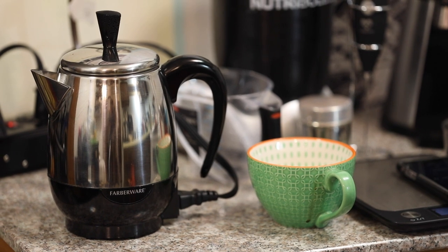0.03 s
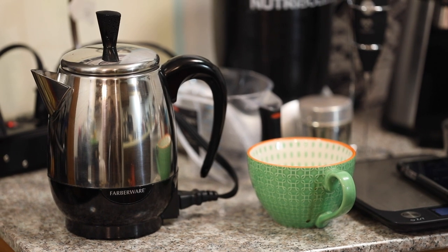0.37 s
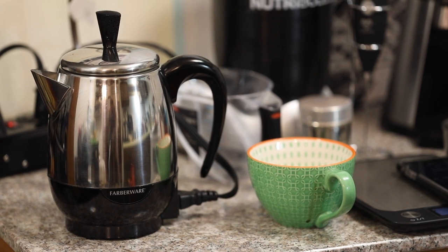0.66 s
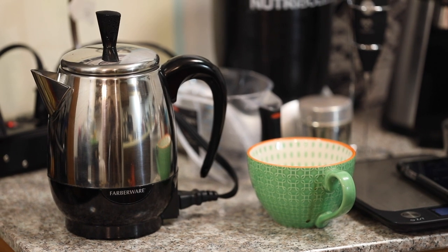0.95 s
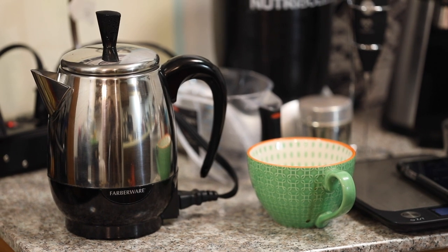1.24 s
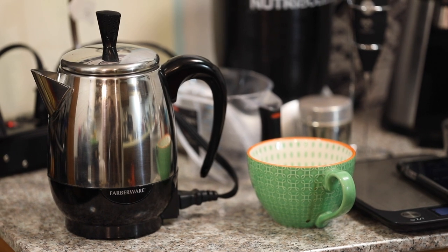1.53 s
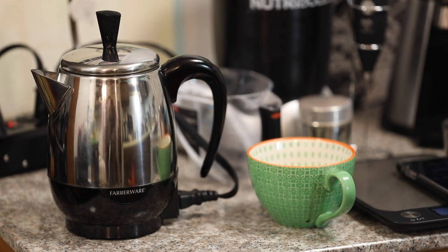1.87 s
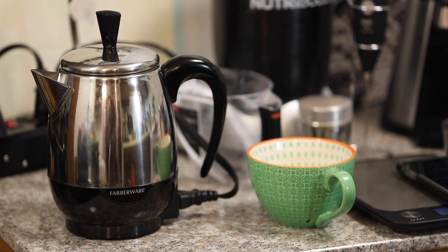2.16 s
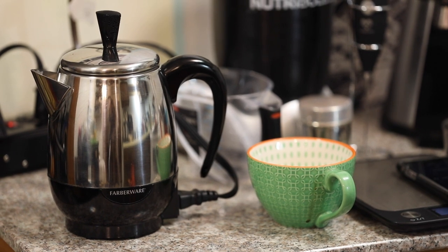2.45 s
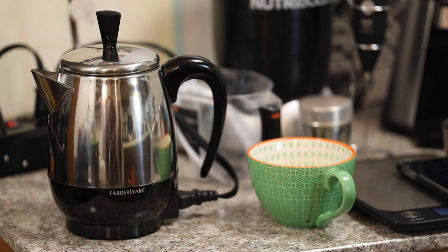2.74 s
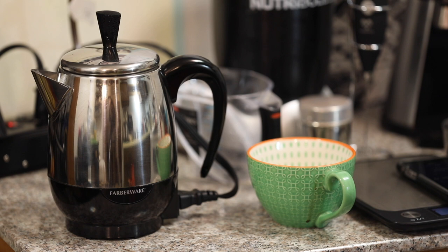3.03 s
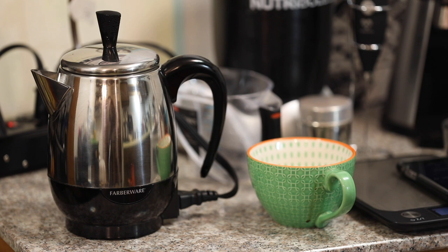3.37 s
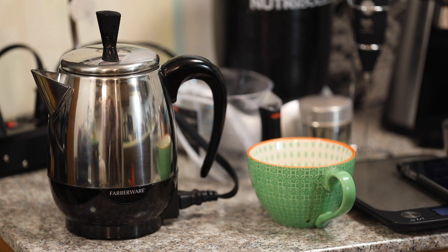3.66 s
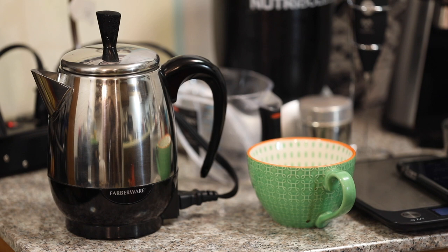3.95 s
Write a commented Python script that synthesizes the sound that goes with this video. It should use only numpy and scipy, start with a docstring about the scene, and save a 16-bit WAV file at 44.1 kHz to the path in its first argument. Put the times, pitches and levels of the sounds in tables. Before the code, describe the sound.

A steel percolator heating water rumbles and patters with soft knocks in a small kitchen. Bubbles blip and fizz faintly while the metal ticks, clicking sharply once early on and clinking lightly now and then.

```python
"""A low rumble with irregular thumps: water heats in a steel percolator on a kitchen counter.
Steam bubbles collapse on the hot base and excite the modes of the pot; a few stand out, many small ones
merge into the rumble. Tiny bubbles ping the steel wall and fizz, freed bubbles ring as blips, the water
pops, loose parts clink and the warming metal ticks, once sharply. A small room reverberates the blips,
pops, clinks and ticks, over a faint mains hum."""
import sys
import numpy as np
from scipy import signal
from scipy.fft import rfft, irfft
from scipy.io import wavfile
from scipy.ndimage import map_coordinates

SR = 44100
rng = np.random.default_rng(int(sys.argv[2]) if len(sys.argv) > 2 else 0)


def dump(signal):
    """Clip the signal to [-1, 1] and save it as 16-bit WAV at the path in sys.argv[1]."""
    limited = np.clip(np.atleast_2d(signal).T, -1, 1)
    pcm = np.round(limited * 32767).astype(np.int16)
    wavfile.write(sys.argv[1], SR, pcm)


N = 176400
T = np.arange(SR // 3) / SR  # time axis of one event, t/s


def amp(db):
    """Amplitude ratio of a level in decibels."""
    return 10 ** (np.asarray(db) / 20)


def unit(x):
    """Normalisation to rms 1."""
    return x / np.sqrt(np.mean(x ** 2) + 1e-20)


def along(points, hz):
    """Interpolation of (f/Hz, value) points on a logarithmic frequency axis."""
    f, values = np.transpose(points)
    return np.interp(np.log(hz + 1), np.log(f + 1), values)


def curve(rows):
    """Linear interpolation of (t/s, value) rows at every sample."""
    return np.interp(np.arange(N) / SR, *np.transpose(rows))


def wobble(knots_per_s):
    """Random modulation: a spline through Gaussian knots."""
    return map_coordinates(rng.standard_normal(4096), [np.arange(N) * knots_per_s / SR], mode="wrap")


def noise(colour, size):
    """Spectral shaping of white noise by (f/Hz, level/dB) points; rms 1."""
    gain = amp(along(colour, np.fft.rfftfreq(size, 1 / SR)))
    return unit(irfft(rfft(rng.standard_normal(size)) * gain, size))


def fade(attack_s, t60):
    """Envelope of a damped vibration: a quick rise and a decay of 60 dB in t60 seconds."""
    return (1 - np.exp(-T / attack_s)) * np.exp(-np.log(1000) * T / t60)


def burst(colour, attack_s, t60):
    """Modal overlap: dense modes decay like a band of noise, with the energy of the envelope."""
    envelope = fade(attack_s, t60)
    return unit(noise(colour, len(T)) * envelope) * np.sqrt(np.mean(envelope ** 2))


def ring(modes, attack_s):
    """Modal synthesis: a sum of damped sinusoids with scattered levels and random phases."""
    chance = rng.standard_normal((len(modes), 2))
    return sum(amp(db + 3.53 * scatter) * np.sin(2 * np.pi * (hz * T + phase)) * fade(attack_s, t60)
               for (hz, db, t60), (scatter, phase) in zip(modes, chance))


def add(track, s, sound):
    """Superposition of a sound on the track, s seconds in."""
    part = track[max(0, round(s * SR)):][:len(sound)]
    part += sound[:len(part)]


def in_room(sound, wet_db):
    """Reverberation: direct sound plus a diffuse field, by convolution with decaying noise."""
    # reverberation time of the small room: f/Hz, t60/s
    room = [(200, 0.28), (2000, 0.42), (12000, .22)]
    hz, t, spectra = signal.stft(rng.standard_normal(len(T)), SR, nperseg=256)
    decay = np.exp(-np.log(1000) * t / along(room, hz)[:, None])
    tail = signal.istft(spectra * decay, SR, nperseg=256)[1]
    return sound + amp(wet_db) * signal.fftconvolve(sound, tail / np.linalg.norm(tail))[:len(sound)]


def hum():
    """Forced vibration: faint steady tones near the mains frequency and its double."""
    # mains tones: f/Hz, level/dB
    tones = [(59, -82), (119.5, -70)]
    return sum(amp(db) * unit(np.sin(2 * np.pi * hz * np.arange(N) / SR)) for hz, db in tones)


def simmer():
    """Incoherent summation: countless tiny bubbles merge into noise and keep a wall mode ringing."""
    # spectra of the low, middle and high bubble noise and of the wall mode: f/Hz, relative level/dB
    rumble_colour = [(25, -35), (72, -34), (92, -17.5), (110, -26.5), (135, -23), (153, -7), (178, -9),
                     (195, -6.5), (215, -5), (262, -2.5), (292, 4.5), (328, -12.5), (365, 6), (398, -5.5),
                     (422, -22), (445, 4), (480, 0.5), (505, -2), (570, -7), (690, -17.5), (850, -14.5),
                     (980, -27.5), (1500, -38), (3000, -96)]
    seethe_colour = [(100, -15), (600, 4.5), (1250, 3), (1800, 0), (2600, -8), (3000, -10), (4000, -16.5),
                     (5200, -27), (8000, -32)]
    fizz_colour = [(2000, -43), (4500, -4.5), (5900, -10), (6220, 3.5), (6420, -12.5), (6780, 11),
                   (7100, -5), (7260, 4.5), (7450, -4), (8000, -1), (8600, -8), (9400, -1), (10200, -5),
                   (10700, 2), (11200, -4), (12500, -5.5), (15700, -9.5)]
    wall_colour = [(2000, -48), (2680, -15), (2790, 1.5), (2900, -17.5), (3600, -31)]
    # slow drift of the rumble and the seethe: t/s, relative level/dB
    rumble_drift = [(0.0, -39.5), (1.78, -40), (1.89, -39), (2.15, -40.5), (2.48, -38), (2.74, -41.5),
                    (3.81, -39), (3.89, -40), (4.0, -38)]
    seethe_drift = [(0.0, -53), (0.43, -57), (0.76, -54.5), (1.73, -56.5), (1.95, -55.5), (2.33, -57.5),
                    (2.96, -54), (3.43, -56), (4.0, -54.5)]
    rumble = amp(curve(rumble_drift) - 2 + wobble(29.9)) * noise(rumble_colour, N)
    seethe = amp(curve(seethe_drift) + 0.5 + 1.2 * wobble(45)) * noise(seethe_colour, N)
    wall = amp(-70 + 3.6 * wobble(14)) * noise(wall_colour, N)
    fizz = amp(-66.5 + 0.6 * wobble(25.6)) * noise(fizz_colour, N)
    return rumble + seethe + wall + fizz


def pings():
    """Impulse excitation: tiny bubbles set high, lightly damped modes of the steel wall ringing."""
    # bubbles at the wall: t/s, relative level/dB
    events = [(0.1002, -50), (0.1401, -68), (0.5173, -57), (0.614, -58), (0.7784, -58), (1.019, -56.5),
              (1.182, -53.5), (1.2411, -55), (1.5207, -58), (1.5868, -59), (1.7752, -61), (1.8925, -63),
              (2.095, -53), (2.367, -52.5), (2.7126, -56), (2.8394, -49.5), (3.0203, -58), (3.0966, -59.5),
              (3.1583, -61), (3.186, -54.5), (3.2688, -56), (3.3676, -58), (3.5094, -57), (3.71, -60),
              (3.9394, -55.5)]
    # response of the wall: f/Hz, relative level/dB
    colour = [(3000, -54), (5900, -24), (6220, -30), (6420, -13), (6620, -4.5), (6780, 0), (6880, -11),
              (6980, -1.5), (7120, -9), (7500, -26), (9000, -37), (10700, -30), (13000, -45)]
    out = np.zeros(N)
    for s, db in events:
        add(out, s, amp(db - 6) * burst(colour, attack_s=0.0014, t60=0.33))
    return out


def ticks():
    """Thermal expansion: the warming steel ticks, each time favouring one band of its modes."""
    # ticks: t/s, relative level/dB, favoured f/Hz
    events = [(0.002, -54, 8500), (0.271, -60, 10800), (0.344, -59, 10800), (0.938, -53.5, 9000),
              (0.975, -55, 7300), (1.246, -53, 10000), (1.28, -55, 9800), (1.324, -55, 11000),
              (1.401, -51, 9300), (1.608, -60, 10500), (2.175, -57.5, 7500), (2.59, -56, 11500),
              (3.168, -54, 11000), (3.186, -57.5, 10000), (3.259, -54.5, 11000), (3.52, -57, 8500),
              (3.599, -61, 11000), (3.714, -59, 10300)]
    # spectrum common to the ticks: f/Hz, relative level/dB
    steel = [(2000, -28), (5500, -13), (6900, 0), (7300, 14), (7700, 0), (8600, -3), (9500, 0), (10200, 3),
             (11400, 2.5), (12400, -2), (14000, -15)]
    fall_db_per_octave = 9
    out = np.zeros(N)
    for s, db, hz in events:
        colour = [(f, level - fall_db_per_octave * abs(np.log2(f / hz))) for f, level in steel]
        add(out, s, amp(db - 2) * in_room(burst(colour, attack_s=0.002, t60=0.068), wet_db=-2))
    return out


def click():
    """A short impulse has a broad spectrum: the warming steel clicks sharply and rebounds."""
    # the click and its rebound: t/s, relative level/dB
    events = [(0.652, -33.5), (0.656, -36.5)]
    # spectrum of the click: f/Hz, relative level/dB
    colour = [(500, -2), (1500, -4), (2400, 1.5), (3300, -7), (4600, -2), (6300, -3), (7400, 5.5),
              (8400, -1), (10500, 1.5), (12500, -4.5), (15000, -18)]
    out = np.zeros(N)
    for s, db in events:
        add(out, s, amp(db - 6) * in_room(burst(colour, attack_s=0.00066, t60=0.05), wet_db=-1.5))
    return out


def clinks():
    """Impact sound: loose metal parts, nudged by the water, scuff and ring in their free modes."""
    # contacts: t/s, relative level/dB
    events = [(0.761, -38), (0.953, -46), (1.336, -52), (2.06, -44), (2.084, -50), (3.055, -52),
              (3.087, -52), (3.882, -49), (3.898, -37.5)]
    # modes of the loose metal: f/Hz, relative level/dB, t60/s
    modes = [(1864, 3, 0.063), (2493, -4, 0.056), (2763, 0, .05), (3220, -0.5, .045), (3444, -2, 0.044),
             (3590, -3, 0.025), (3940, -2.5, 0.042), (4350, -8.5, .045)]
    # contact noise: f/Hz, relative level/dB
    scuff = [(900, -20), (1900, -6), (2500, -1.5), (3400, 0.5), (4200, -3), (4800, -16), (8000, -45)]
    out = np.zeros(N)
    for s, db in events:
        contact = 0.74 * ring(modes, attack_s=0.0016) + amp(2) * burst(scuff, attack_s=0.0027, t60=0.055)
        add(out, s, amp(db - 9.5) * in_room(contact, wet_db=-7))
    return out


def pops():
    """Band-limited transients: each wet pop is brief noise whose spectral peak gives it a pitch."""
    # wet pops: t/s, relative level/dB, peak f/Hz
    events = [(0.93, -50, 2100), (0.953, -42.5, 1950), (1.324, -48, 2700), (1.402, -45, 2550),
              (2.012, -43.5, 1490), (2.061, -41.5, 1390), (2.09, -46, 1300), (2.367, -44.5, 1700),
              (2.949, -48, 1550), (3.08, -50, 2000), (3.255, -47, 2500)]
    out = np.zeros(N)
    for s, db, hz in events:
        colour = [(hz / 4, -18), (hz / 1.5, -3), (hz, 0), (hz * 1.28, -5), (hz * 2.2, -22), (hz * 3, -50)]
        add(out, s, amp(db - 4) * in_room(burst(colour, attack_s=0.0013, t60=0.053), wet_db=0))
    return out


def blips():
    """Bubble resonance: gas as spring and water as mass ring briefly, rising in pitch."""
    # freed bubbles: t/s, relative level/dB, starting f/Hz
    bubbles = [(0.324, -36.5, 856), (0.343, -42, 1200), (0.345, -40, 897), (0.375, -48, 1380),
               (0.76, -33, 809), (0.93, -47, 1527), (1.173, -45.5, 1345), (1.252, -38.5, 890),
               (1.8, -33.5, 768), (1.85, -36, 773), (1.926, -38, 870), (2.095, -32.5, 747),
               (2.306, -38.5, 828), (2.367, -39.5, 845), (2.61, -40, 716), (2.843, -37, 850),
               (2.903, -35, 786), (2.949, -33.5, 740), (3.033, -38, 808), (3.075, -41.5, 1250),
               (3.247, -34, 735), (3.305, -36.5, 793), (3.396, -36, 626), (3.586, -40, 883),
               (3.66, -40, 814), (3.967, -35, 847)]
    rise_per_s = 2.5  # relative to the starting frequency
    out = np.zeros(N)
    for s, db, hz in bubbles:
        phase = 2 * np.pi * hz * T * (1 + rise_per_s * T / 2)
        tone = np.sin(phase) * fade(attack_s=0.0012, t60=0.04)
        add(out, s, amp(db + 3) * in_room(tone, wet_db=-8))
    return out


def collapse(hz):
    """Cavity collapse: a steam bubble's pressure pulse knocks the pot and excites its modes; peak 1."""
    # modes of the filled pot: f/Hz, relative level/dB, t60/s
    pot_modes = [(159, -28, 0.6), (201, -20.5, 0.033), (239, -16, 0.23), (286.7, -6.5, 0.15),
                 (364.7, -0.5, 0.22), (378.7, -0.5, 0.15), (444, 0.5, .18), (470, 5, 0.12),
                 (567.2, 7.5, 0.13), (660, -1, .1), (795, -21.5, 0.24), (761, -15.5, 0.19),
                 (844, -3.5, 0.091), (1008, -22.5, 0.36), (1385, -19, 0.21)]
    # spectrum of the dull knock: f/Hz, relative level/dB
    knock_colour = [(60, -24), (200, -13), (400, 4.5), (560, 3.5), (850, -1.5), (1050, -14.5),
                    (1800, -26.5), (4000, -41), (9000, -50)]
    push = np.sin(2 * np.pi * hz * T) * fade(attack_s=0.0033, t60=0.036)
    pot = amp(-19) * ring(pot_modes, attack_s=0.001)
    knock = amp(-13) * burst(knock_colour, attack_s=0.0017, t60=0.07)
    sound = push + pot + knock
    rebound_s = 0.01168 * np.exp(0.11 * rng.standard_normal())  # a weaker repeat of the push follows about 12 ms later
    add(sound, rebound_s, amp(-3) * push)
    return sound / np.abs(sound).max()


def thumps():
    """Shot noise: small collapses patter at random times, and the strong ones stand out as thumps."""
    # strong collapses: t/s, relative level/dB, f/Hz
    strong = [(0.044, -37, 405), (0.062, -35, 457), (0.093, -30.5, 572), (0.185, -30.5, 380),
              (0.258, -26, 446), (0.326, -31.5, 394), (0.344, -35.5, 373), (0.393, -28.5, 580),
              (0.478, -29, 451), (0.526, -41, 445), (0.666, -28.5, 474), (0.713, -27, 556),
              (0.76, -23, 490), (0.879, -32, 480), (0.961, -34.5, 370), (1.014, -31, 450),
              (1.027, -28, 413), (1.098, -25, 467), (1.204, -31, 567), (1.249, -35, 400),
              (1.304, -31.5, 550), (1.321, -32, 467), (1.362, -37, 368), (1.394, -30, 386),
              (1.466, -27.5, 576), (1.529, -34.5, 440), (1.596, -32, 460), (1.647, -28, 364),
              (1.671, -32, 442), (1.722, -36, 374), (1.753, -29, 535), (1.802, -28, 440), (1.848, -34, 470),
              (1.896, -29, 610), (1.964, -34, 377), (2.084, -29.5, 445), (2.237, -35, 550),
              (2.368, -29, 382), (2.462, -30, 423), (2.608, -27, 537), (2.722, -28, 430), (2.751, -28, 363),
              (2.838, -29.5, 367), (2.85, -29.5, 450), (2.904, -33.5, 393), (2.948, -28, 466),
              (3.011, -27.5, 434), (3.042, -27.5, 446), (3.172, -32, 367), (3.238, -28, 446),
              (3.362, -30, 363), (3.387, -32.5, 560), (3.441, -29.5, 384), (3.518, -28.5, 360),
              (3.643, -31, 550), (3.665, -32.5, 456), (3.695, -34.5, 380), (3.766, -34.5, 428),
              (3.897, -29, 455), (3.946, -27.5, 380), (3.967, -29.5, 510)]
    small_per_s, small_db, spread_db = 60, -41.5, 2
    out = np.zeros(N)
    for s, db, hz in strong:
        add(out, s, amp(db - 0.88) * collapse(hz))
    small = [collapse(440 * np.exp(0.258 * scatter)) for scatter in rng.standard_normal(size=24)]
    onsets = rng.random(size=600)[:int(small_per_s * N / SR)] * N / SR
    for s, scatter in zip(onsets, rng.standard_normal(size=600)):
        add(out, s, amp(small_db + spread_db * min(scatter, 2)) * small[rng.integers(len(small))])
    return out


def scene():
    """Linear superposition of all sources at one point."""
    return (thumps() + blips() + simmer() + pops() + clinks() + pings() + ticks() + click() + hum())[None]


def record(dry):
    """Band limiting: an ideal low-pass filter removes the highest treble."""
    cutoff_hz = 15750
    passband = np.fft.rfftfreq(2 * N, 1 / SR) < cutoff_hz
    return irfft(rfft(dry, 2 * N) * passband)[:, :N]


dry = scene()
out = record(dry)
dump(out)
```